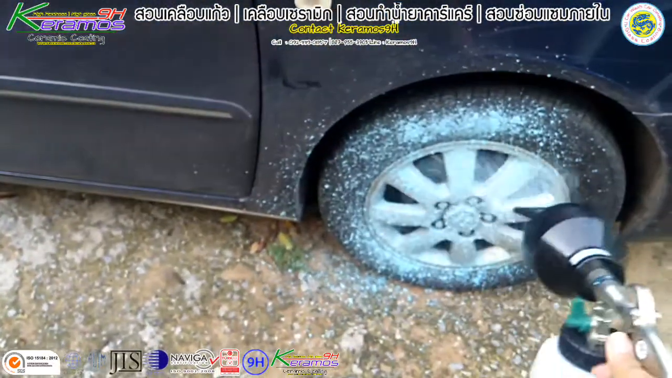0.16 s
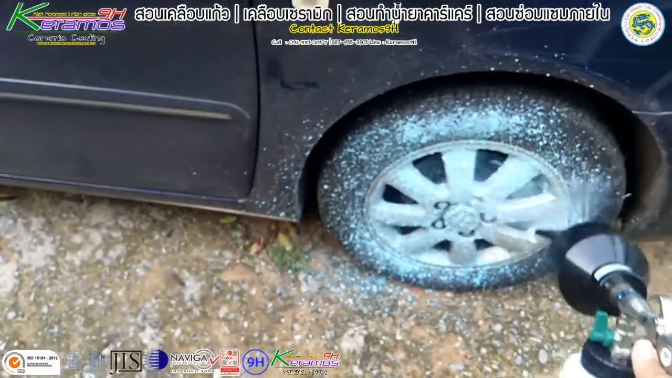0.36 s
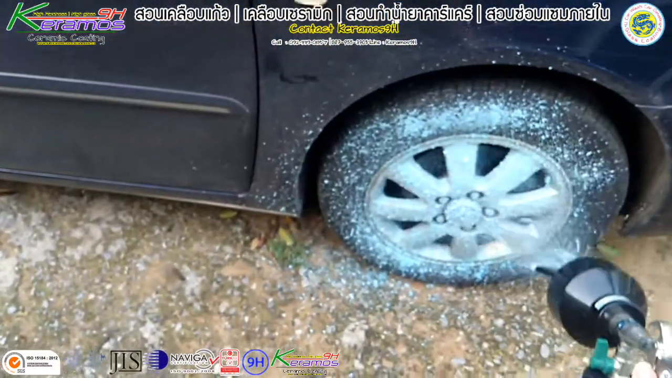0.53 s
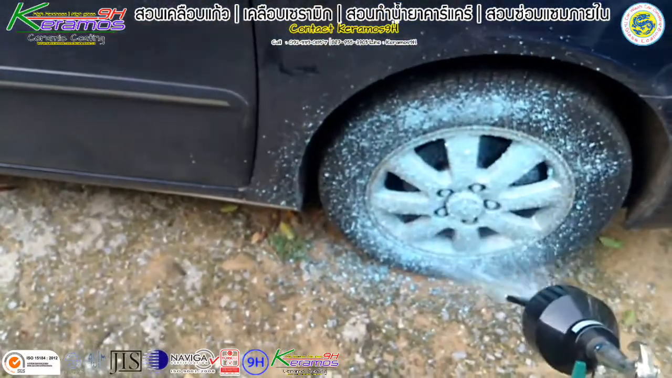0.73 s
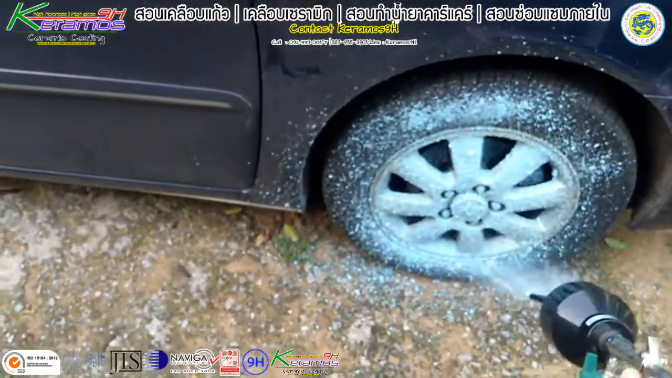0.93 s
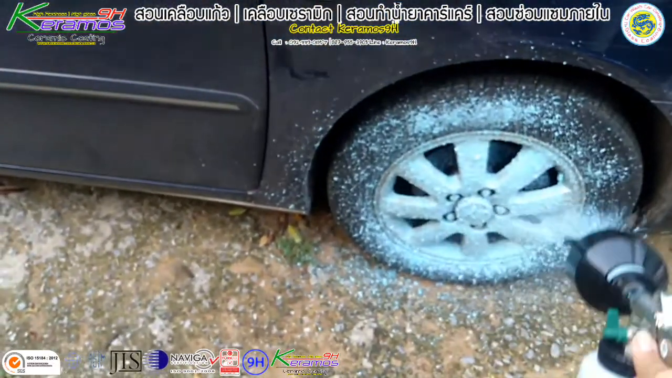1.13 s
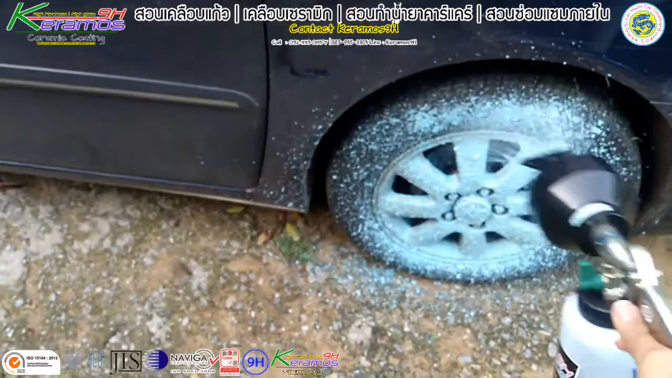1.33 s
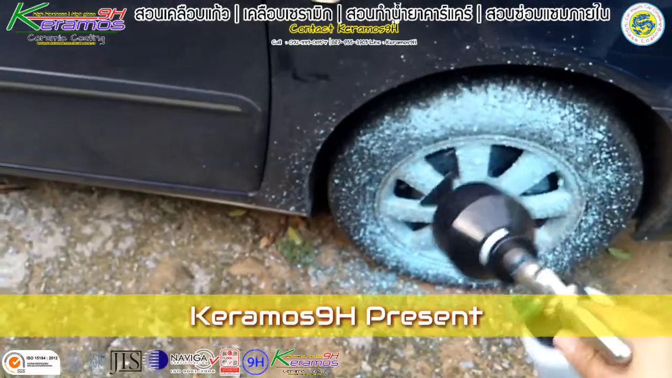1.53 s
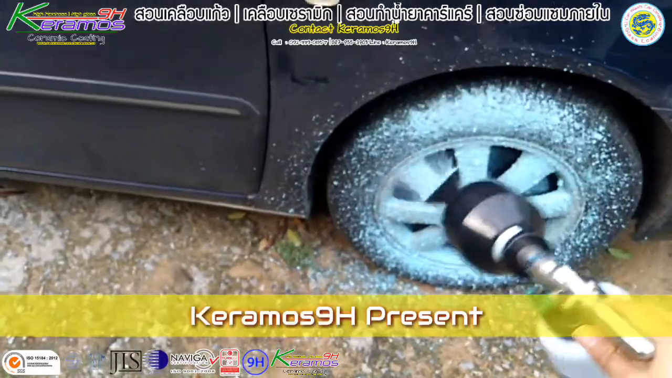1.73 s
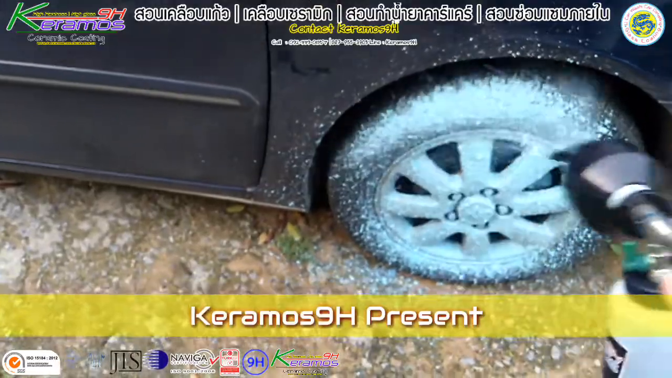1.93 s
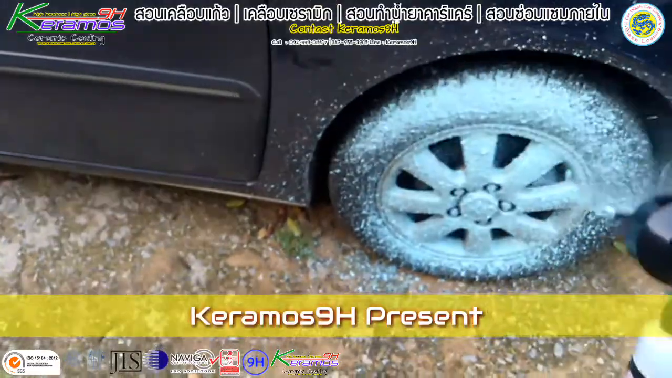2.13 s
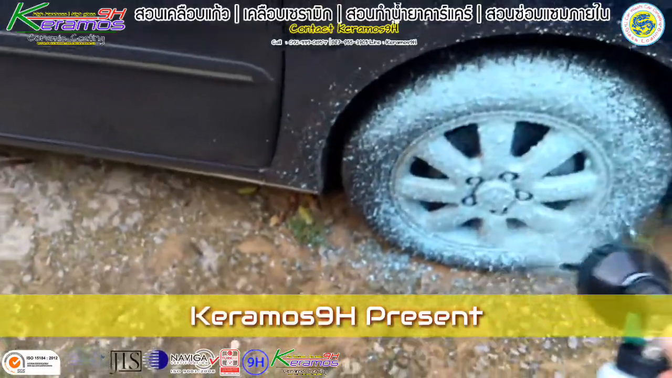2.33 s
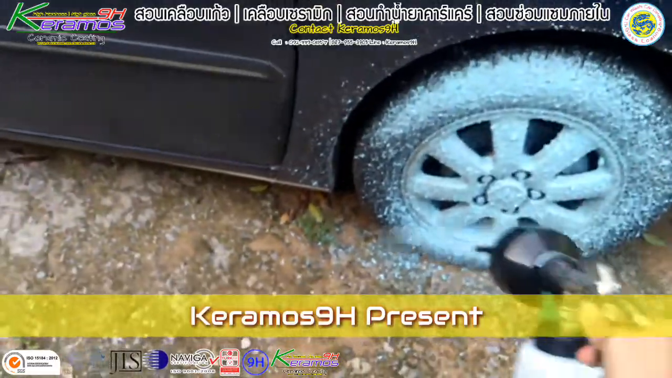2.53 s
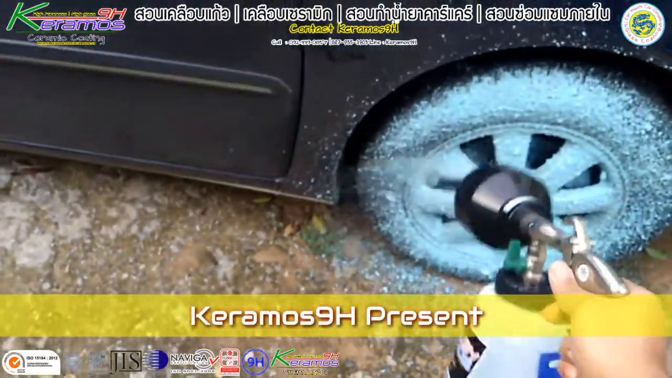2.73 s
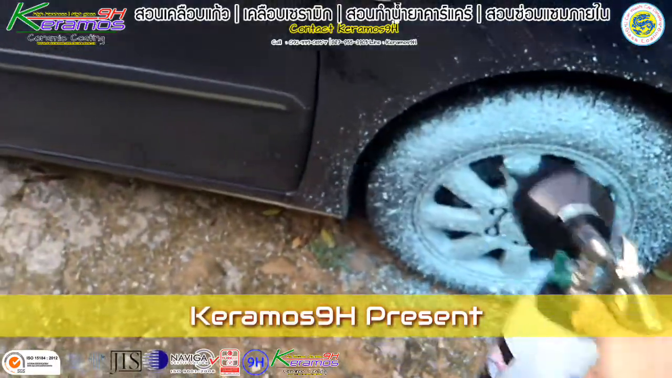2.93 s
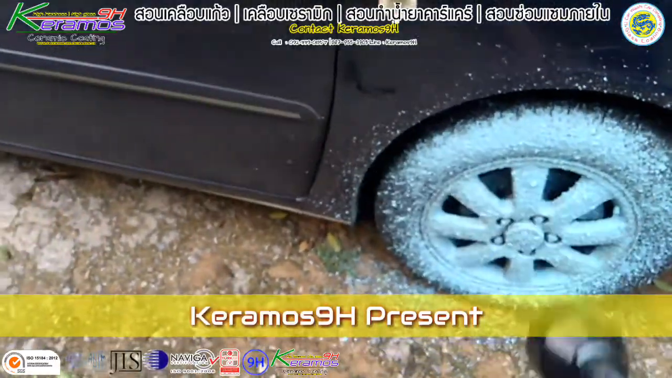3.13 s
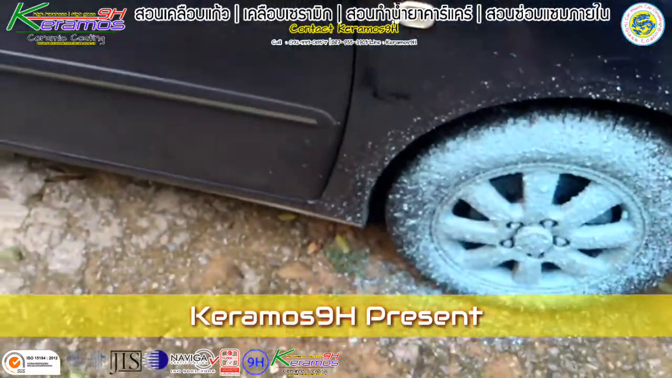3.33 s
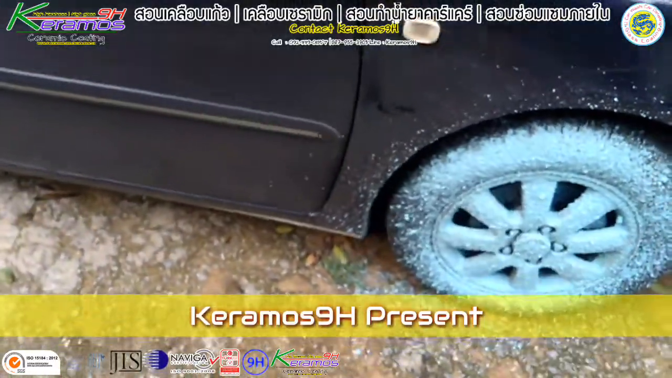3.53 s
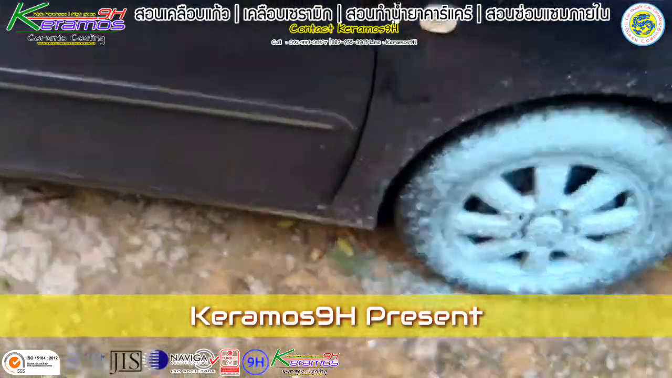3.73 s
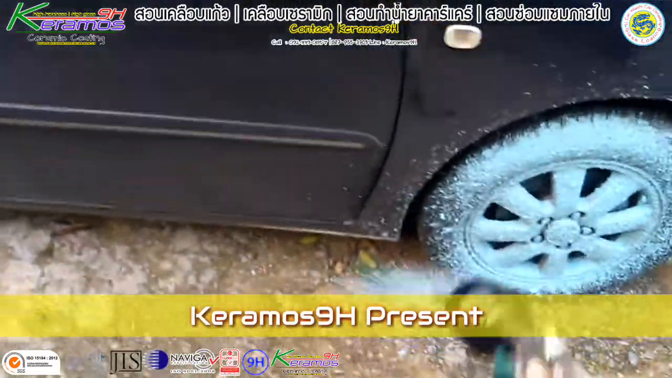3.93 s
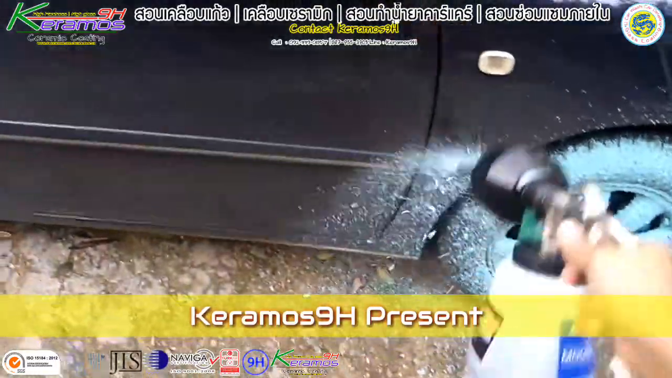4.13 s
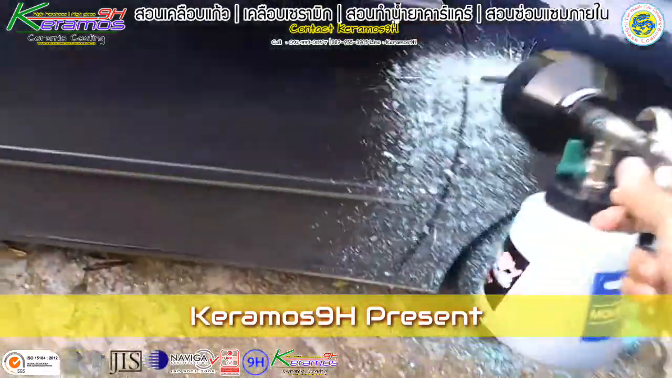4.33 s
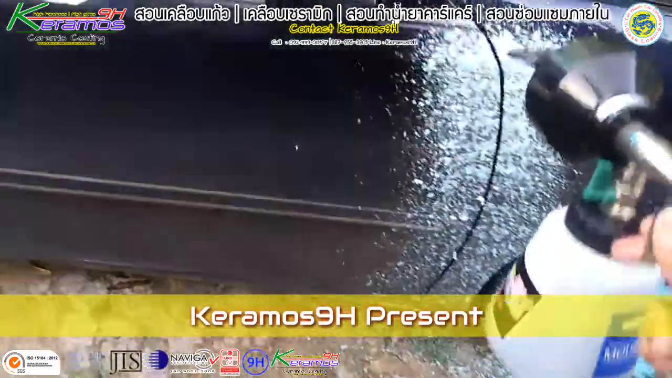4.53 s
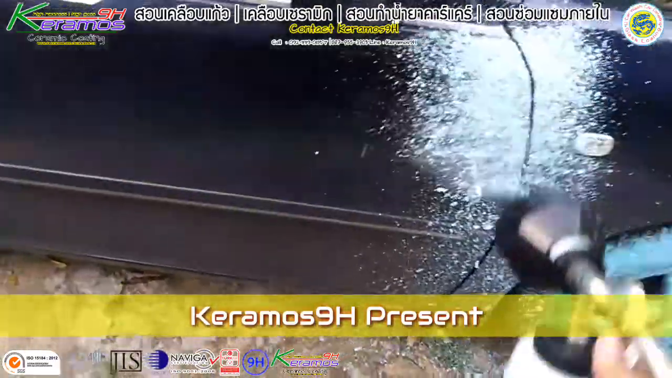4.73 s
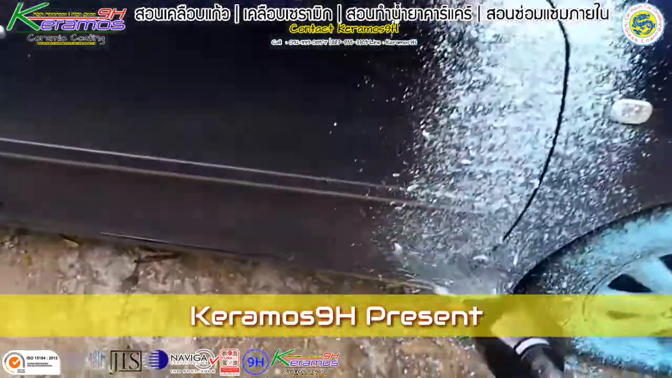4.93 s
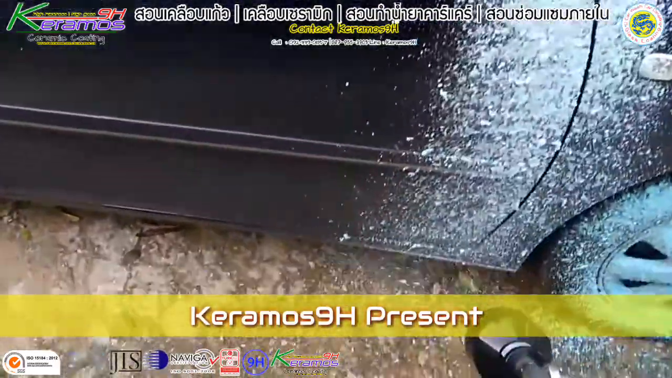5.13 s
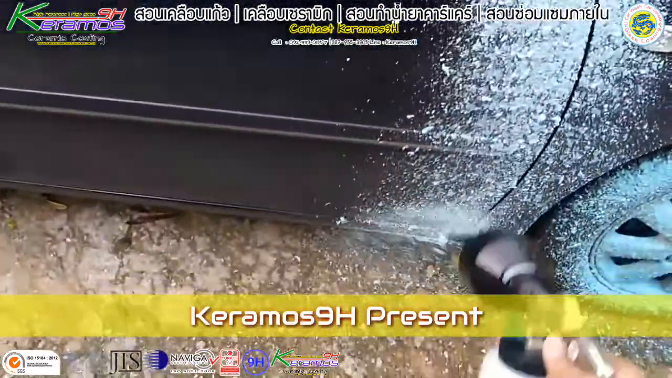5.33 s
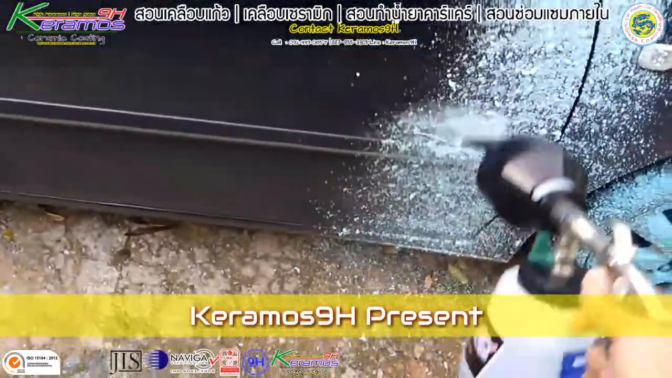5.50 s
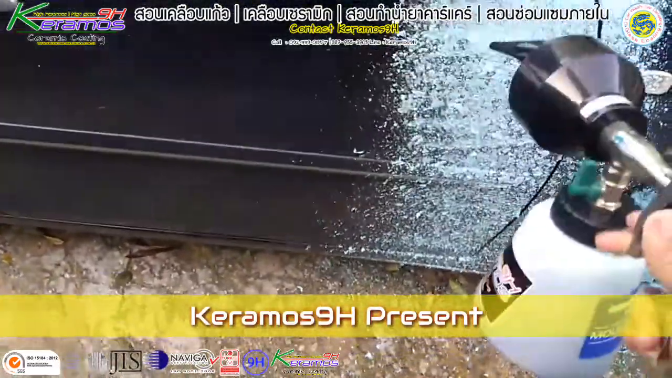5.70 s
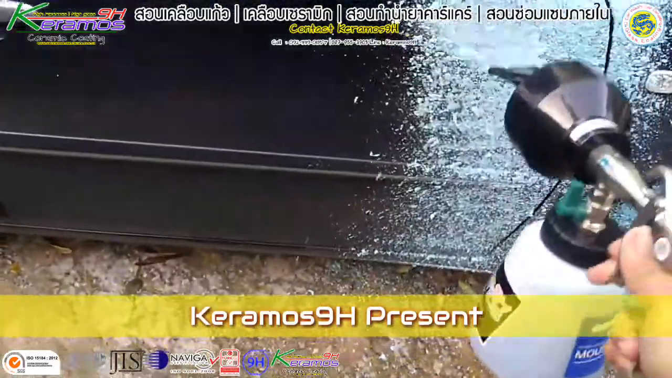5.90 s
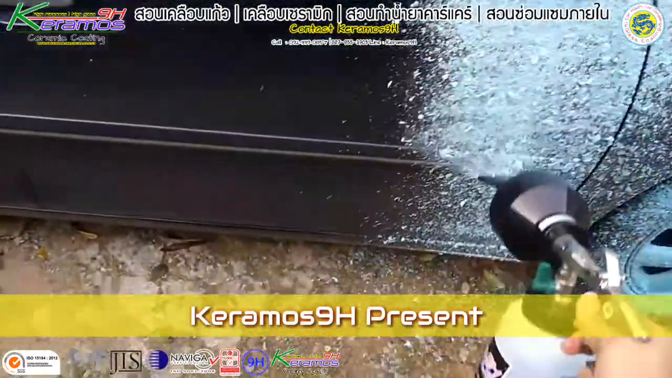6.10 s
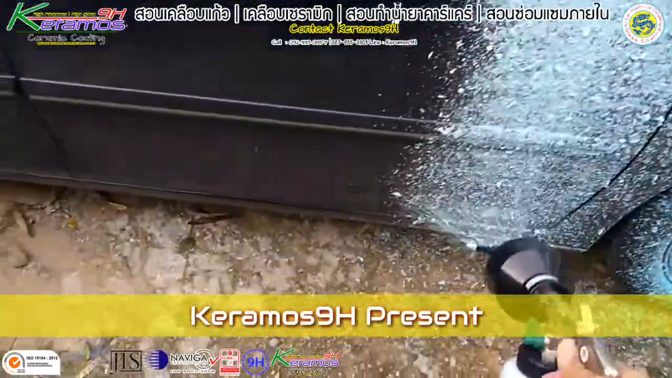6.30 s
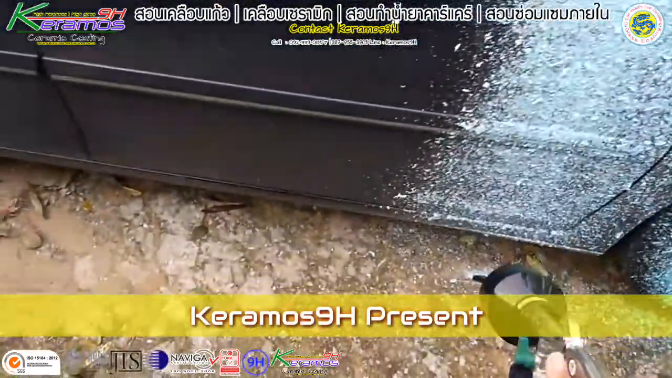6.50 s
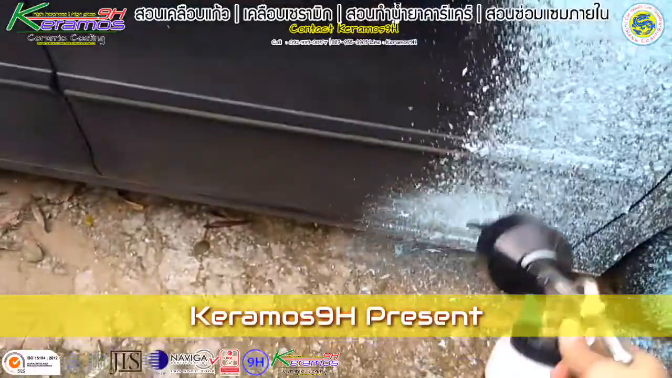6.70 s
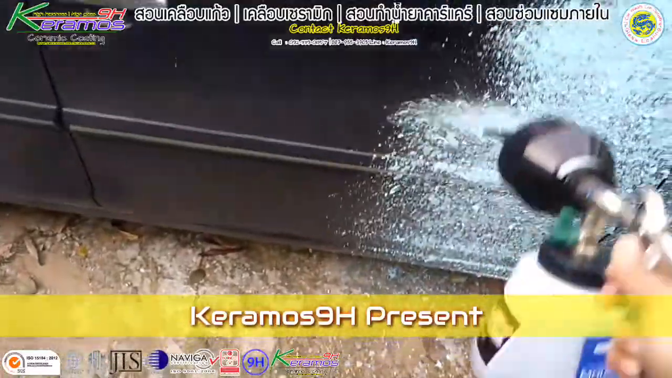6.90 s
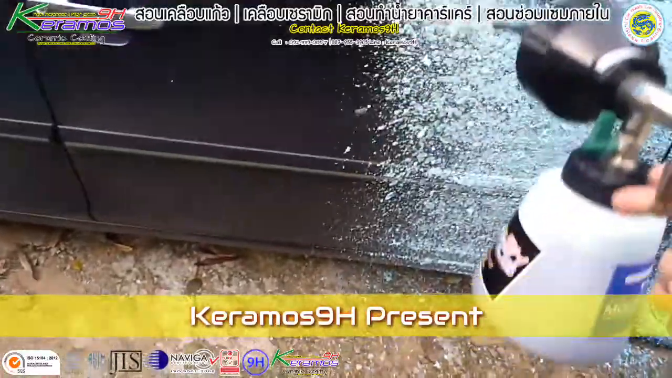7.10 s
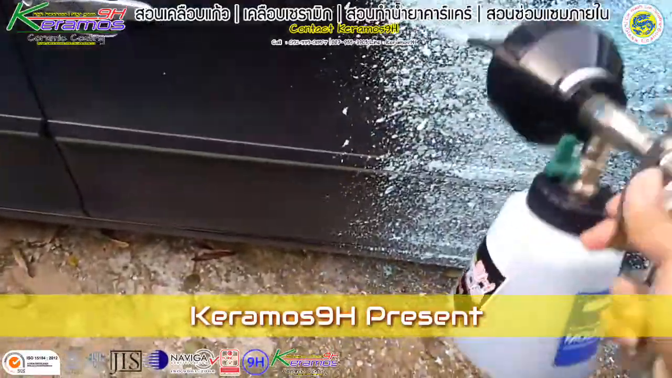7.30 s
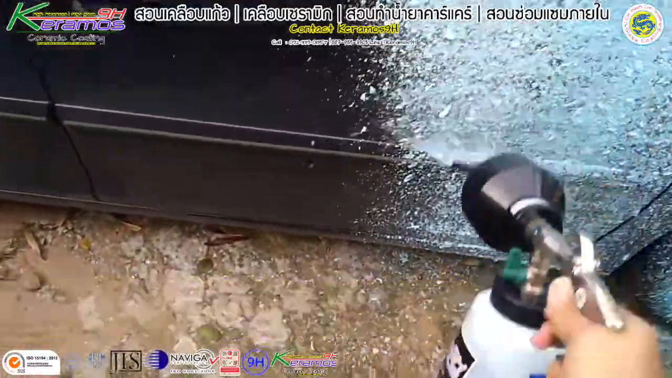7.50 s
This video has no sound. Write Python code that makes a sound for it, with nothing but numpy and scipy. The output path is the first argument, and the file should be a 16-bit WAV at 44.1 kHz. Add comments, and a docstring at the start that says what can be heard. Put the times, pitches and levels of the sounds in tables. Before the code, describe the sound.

Close, repeated bursts of hissing air and soap foam coat a car's wheel and door, with a low hum and rumble beneath.

```python
"""A loud, sputtering hiss: an air-driven foam gun sprays a car's wheel, then its door, outdoors.
In each of ten trigger pulls, rushing air makes the hiss and soap makes it sputter. Echoes off the
ground and the bodywork sweep its tone as the hand moves. The valve squeaks as it shuts and leaks
faintly between pulls. Behind it a machine, likely the compressor, throbs with two close low tones,
over an outdoor rumble, a far engine and one brush of wind."""
import sys
import numpy as np
from scipy import signal
from scipy.io import wavfile
from scipy.ndimage import map_coordinates

SR = 44100
rng = np.random.default_rng(int(sys.argv[2]) if len(sys.argv) > 2 else 0)


def put_to_file(sound):
    """Save the sound as 16-bit audio at rate SR, in the file named by the first command-line argument."""
    columns = np.atleast_2d(sound).T  # one column per channel
    safe = np.clip(columns, -1, 1)
    whole_steps = np.round(safe * 32767)
    wavfile.write(sys.argv[1], SR, whole_steps.astype(np.int16))


N = 332955
TIME = np.arange(N) / SR

# Trigger pulls. Each row: when the valve cracks, opens and shuts in seconds; hiss, opening surge,
# mist, low roar and singing band in relative dB; when the gun is nearest the bodywork in seconds,
# and that echo's delay in ms and level in dB at that moment.
PULLS = [(-.22, -0.202, 0.38, -14, -2, -0.5, 0, -5, .43, 0.95, -22),
         (0.461, 0.48, 0.92, -15, 3.5, -1.4, 0.5, -7, .43, .8, -14),
         (1.036, 1.053, 1.571, -15, 2, -0.5, 1, -10.5, 1.45, 0.83, -19),
         (1.834, 1.855, 2.973, -15, 4, -1.4, 0.5, -9, 2.95, 0.74, -14),
         (3.969, 3.997, 4.542, -14.5, 3, .5, -0.5, -13, 4.32, 0.96, -7.5),
         (4.674, 4.695, 5.19, -14, -1, 0.8, -1, -7.5, 5.02, 0.72, -4.5),
         (5.322, 5.343, 5.83, -14, 2, 0.5, -2.5, -18, 5.52, 0.73, -4.5),
         (5.977, 5.996, 6.473, -15, 4, 1.5, -1.5, -9, 6.34, 0.73, -5),
         (6.627, 6.641, 7.241, -14.5, 2, 0.5, -1, -22, 6.83, 0.893, -6),
         (7.357, 7.386, 7.78, -14.5, 2.5, 1, -2.5, -9.5, 7.78, .9, -6)]
# The tone of the hiss. Each row: frequency in Hz, relative level in dB.
HISS_SPECTRUM = [(120, -53), (200, -8), (231, -11), (381, -10), (517, -14), (1060, -3.5), (1490, -3.5),
                 (2210, -2.5), (2740, -2.5), (3280, 0), (5310, 2.5), (7080, -6.5), (10700, -13),
                 (13000, -13), (14500, -42)]
# Each row: frequency in Hz, how alike left and right are (0 unrelated, 1 or more the same).
HISS_LIKENESS = [(300, 1.5), (1200, .68), (3000, 0.24), (6000, 0.03), (12000, 0)]
# Each row: frequency in Hz, left level minus right level in dB.
HISS_BALANCE = [(200, -1), (370, 0.5), (680, -2), (1250, -6), (2300, -6), (4200, -5.5), (6000, -6),
                (8000, -8), (14000, -10)]
# The hiss dips briefly. Each row: time in seconds, level change in dB.
HISS_DIPS = [(0.075, -1)]
def jet(level_db=-3.5, splash_db=-.5, splash_follows=.54, patchy_db=1.46):
    """Churning air hisses and soap shakes it; splashing foam fills the middle, fine mist the top."""
    _, opens, _, hiss_db, surge_db, mist_db, roar_db, sing_db, *_ = current_pull()
    drive_db = pressure(np.maximum(TIME - opens, 0), surge_db)
    centres, bands = noise_bands(HISS_SPECTRUM, HISS_LIKENESS, per_octave=4)
    flutter_db = 1.59 * drift(49)   # the fan of foam flaps; the top stays steadier
    splash_shift_db = splash_db - (1 - splash_follows) * drive_db   # follows pressure only partly
    spray = singing_band(sing_db + patchy_db * drift(22), drive_db)
    for hz, band in zip(centres, bands):
        low = at_hz([(750, 1), (1050, 0)], hz)
        below_top = at_hz([(1700, 1), (3000, 0)], hz)
        top = at_hz([(6000, 0), (8500, 1)], hz)
        colour_db = low * roar_db + below_top * splash_shift_db + top * mist_db
        waver_db = (1 - top) * flutter_db + patchy_db * drift(16)
        spray = spray + band * panned(at_hz(HISS_BALANCE, hz)) * from_db(colour_db + waver_db)
    dip_db = sum(db * puff(s, .007) for s, db in HISS_DIPS)
    sputter_db = .33 * drift(68) + 1.07 * drift(210)
    return spray * valve() * from_db(level_db + hiss_db + drive_db + dip_db + sputter_db)


def current_pull():
    """The settings of the latest pull at every sample; the next takes over as its valve cracks."""
    rows = np.array(PULLS)
    return rows[np.maximum(np.searchsorted(rows[:, 0], TIME) - 1, 0)].T


def valve(open_s=.0048, shut_s=.0049, bleed_db=-16, bleed_s=.055, crack_db=-21):
    """Air flow: the valve cracks, then opens; after it shuts, the air left in the gun bleeds away."""
    flow = np.zeros(N)
    for cracks, opens, shuts, *_ in PULLS:
        rise = np.maximum(step(opens, open_s), from_db(crack_db) * step(cracks, .002))
        closed = step(shuts, shut_s)
        bleed = from_db(bleed_db) * np.exp(-np.maximum(TIME - shuts, 0) / bleed_s)
        flow += rise * (1 - closed + closed * bleed)
    return flow


def pressure(held_s, surge_db, peak_s=.037, period_s=.2, decay_s=.058, sag_db=2, sag_s=.46):
    """The jet's push in dB: air stored in the hose surges and settles, then the supply sags."""
    since_peak = held_s - peak_s
    surge = surge_db * np.exp(-np.abs(since_peak) / decay_s) * np.cos(2 * np.pi * since_peak / period_s)
    sag = sag_db * (1 - np.exp(-held_s / sag_s))
    return surge - sag + .5 * drift(6.2)


# The nozzle's note. Each row: time in seconds, pitch in Hz.
NOZZLE_PITCH = [(0, 5200), (.5, 5000), (.6, 4650), (.85, 5100), (1.35, 4550), (1.9, 5100), (2.15, 4700),
                (2.9, 5650), (4.02, 5000), (4.2, 5450), (6, 5700), (7.55, 5400)]
def singing_band(level_db, drive_db, extra_swing=.87):
    """The nozzle sings a breathy note that swings with the pressure more than the hiss does."""
    hz, = in_time(NOZZLE_PITCH)
    return panned(-8) * from_db(level_db + extra_swing * drive_db) * whistle(hz, width_hz=400)


# The hand swings up and down. Each row: turning point in seconds, ground echo delay in ms.
HAND_SWINGS = [(-.4, 3), (.1, 3.75), (1, 2.38), (1.75, 3.9), (2.55, 2.22), (3.3, 3.8), (3.95, 2.6),
               (4.5, 3.7), (5.25, 2.25), (5.95, 3.2), (6.5, 2.3), (7.22, 3.5), (7.8, 2.4)]
# The ground echo is stronger by the wheel than by the door.
# Each row: time in seconds, level in dB with the hand at its lowest.
GROUND_ECHO = [(3, -7), (4, -16.5)]
def echo_paths(sweep_ms_per_s2=3.75):
    """Delay and strength of the ground and bodywork echoes; each weakens as its path grows."""
    *_, nearest_s, nearest_ms, nearest_db = current_pull()
    ground_db, = in_time(GROUND_ECHO)
    ground_ms = eased(HAND_SWINGS)
    ground_gain = from_db(ground_db) * ground_ms.min() / ground_ms
    body_ms = nearest_ms + sweep_ms_per_s2 * np.square(TIME - nearest_s)
    body_gain = from_db(nearest_db) * nearest_ms / body_ms
    return ground_ms, ground_gain, body_ms, body_gain


# The nozzle's direction. Each row: time in seconds, how much sooner the left side hears it in ms.
LEFT_LEAD = [(0, .03), (.35, .135), (1.25, .14), (1.7, .03), (2.35, .18), (2.75, .04), (4.9, .07),
             (5.8, .05), (7.55, .07)]
def reflections(spray, dull_hz=7000, scatter_db=-12.5, scatter_count=5, sway_ms=.2, spread_ms=.03):
    """Echoes off the ground and bodywork boost some pitches of the hiss and cancel others."""
    lead_ms, = in_time(LEFT_LEAD)
    ground_ms, ground_gain, body_ms, body_gain = echo_paths()
    # rim, arch and bottle scatter only the treble, on paths that sway with the hand
    paths = [(ms + sway_ms * drift(1.51), rng.choice([-1, 1]))
             for ms in rng.uniform(1, 4.5, scatter_count)]
    sides = []
    for direct in spray:
        dull = signal.sosfilt(signal.butter(1, dull_hz, fs=SR, output="sos"), direct)
        treble = signal.sosfilt(signal.butter(1, 1000, "high", fs=SR, output="sos"), direct)
        ground = ground_gain * delayed(dull, ground_ms)
        body = body_gain * delayed(dull, body_ms + .5 * spread_ms * drift(4.6))
        gun = from_db(-20) * delayed(dull, ms=.902)   # a steady echo, likely off the gun itself
        scatter = sum(sign * delayed(treble, ms + spread_ms * rng.standard_normal())
                      for ms, sign in paths)
        sides.append(direct + ground + body + gun + from_db(scatter_db) * scatter)
    power = 1 + ground_gain ** 2 + body_gain ** 2 / 2 + scatter_count * from_db(scatter_db) ** 2
    return np.array([sides[0], delayed(sides[1], lead_ms)]) / np.sqrt(power)


# The tone of the leak. Each row: frequency in Hz, relative level in dB.
LEAK_SPECTRUM = [(600, 0), (850, 1.5), (1300, -4.5), (2000, -2.5), (2900, -6.5), (4200, -11), (5700, -4.5),
                 (7200, -13), (10000, -18), (14500, -22)]
# Each row: frequency in Hz, how alike left and right are (0 is unrelated).
LEAK_LIKENESS = [(600, .4), (1300, 0)]
# Valve squeaks. Each row: time in seconds, pitch in Hz, level in dB.
SQUEAKS = [(.95, 7900, -51), (1.58, 8100, -38), (2.972, 8040, -33), (4.565, 7700, -40), (5.215, 8000, -54),
           (5.85, 9460, -32), (6.505, 8000, -44), (7.255, 8100, -35)]
# The idle nozzle spits foam. Each row: time in seconds, level in dB.
SPITS = [(3.235, -55), (3.33, -61), (3.65, -55), (3.9, -62)]
# The tone of a spit. Each row: frequency in Hz, relative level in dB.
SPIT_SPECTRUM = [(3500, -17), (4600, -2), (7000, -2), (10000, -17), (14500, -5)]
def valve_noises(leak_db=-53.5, thin_db=-69, squeak_s=.0078, spit_s=.021):
    """The narrowing gap squeaks as it shuts; a faint leak and thin whistle never stop, and foam spits."""
    thin_whistle = from_db(thin_db + 3 * drift(8)) * whistle(8550, width_hz=360)
    leak = from_db(leak_db) * sum(noise_bands(LEAK_SPECTRUM, LEAK_LIKENESS, per_octave=3)[1])
    squeaks = sum(from_db(db) * whistle(hz, width_hz=130) * puff(s, squeak_s) for s, hz, db in SQUEAKS)
    spits = noise(SPIT_SPECTRUM) * sum(from_db(db) * puff(s, spit_s) for s, db in SPITS)
    return (leak + thin_whistle + squeaks + spits) * panned(-4)


# The machine's main tone. Each row: time in seconds, level in dB.
MAIN_LEVEL = [(0.0, -34), (0.14, -26), (1.41, -29.5), (1.62, -26.5), (2.37, -31), (2.52, -26), (3.7, -26),
              (5.13, -37.5), (6.94, -31.5), (7.55, -62)]
# Its lower tone. Each row: time in seconds, level in dB.
LOWER_LEVEL = [(0.0, -52), (0.04, -46), (3.28, -37), (3.7, -49), (3.81, -45), (5.68, -55), (5.72, -39),
               (6.96, -41), (7.55, -63)]
def machine(main_hz=77.75, lower_hz=67.9):
    """Two close low tones slip in and out of step, throbbing about ten times a second."""
    main_db, = in_time(MAIN_LEVEL)
    lower_db, = in_time(LOWER_LEVEL)
    main_pitch = main_hz + .28 * drift(1)
    lower_pitch = lower_hz + .66 * drift(2.6)
    hum = tone(main_pitch) + from_db(-26 + 3 * drift(6)) * tone(2 * main_pitch)
    waver_db = .7 * drift(6)
    return from_db(main_db + waver_db) * hum + from_db(lower_db) * tone(lower_pitch)


# Each row: time in seconds, firing rate in Hz, levels in dB of the tones at 2 and 3 times that rate.
ENGINE_DRONE = [(0, 68, -60, -58), (.6, 67.6, -61, -60), (1.15, 67.8, -45, -42.5), (1.8, 67.8, -44.5, -45),
                (2.15, 68, -58, -55), (4, 70, -64, -63), (6.6, 73.75, -61, -63), (7.1, 73.1, -52.5, -67),
                (7.55, 71.8, -44.5, -66)]
def far_engine():
    """A distant engine drones at two and three times its firing rate."""
    firing_hz, second_db, third_db = in_time(ENGINE_DRONE)
    firing_hz = firing_hz + .356 * drift(4)
    return from_db(second_db) * tone(2 * firing_hz) + from_db(third_db) * tone(3 * firing_hz)


# A puff of wind. Each row: time in seconds, level in dB.
GUSTS = [(1.42, -32)]
# Its tone. Each row: frequency in Hz, relative level in dB.
GUST_SPECTRUM = [(20, -2), (45, -7), (110, -2), (200, -20)]
def wind(gust_s=.027):
    """Wind brushes the microphone with a short, low bump."""
    return noise(GUST_SPECTRUM) * sum(from_db(db) * puff(s, gust_s) for s, db in GUSTS)


# The rumble's rise and fall. Each row: time in seconds, level in dB shared by its two layers.
RUMBLE_LEVEL = [(0, -42.5), (1.1, -39), (3.8, -39.5), (4.9, -40.5), (5.2, -42), (6.9, -44.5), (7.55, -49)]
# The low layer. Each row: frequency in Hz, relative level in dB.
LOW_SPECTRUM = [(65, -32), (110, 3), (146, -4.5), (211, -7), (247, -13), (271, -15), (362, -14.5),
                (590, -16), (1200, -28), (1560, -77), (2640, -120)]
# The deepest layer. Each row: frequency in Hz, relative level in dB.
DEEP_SPECTRUM = [(20, -22), (32, -25), (48, -2), (62, 0.5), (85, -6), (110, -28), (150, -34)]
def outdoor_rumble(low_db=-2, deep_db=1):
    """Two layers of low noise swell a little, then fade."""
    level_db, = in_time(RUMBLE_LEVEL)
    layers = from_db(low_db) * noise(LOW_SPECTRUM) + from_db(deep_db) * noise(DEEP_SPECTRUM)
    return from_db(level_db) * layers


def noise_bands(spectrum, likeness, per_octave):
    """Band centres in Hz and their stereo noises, which add up to a noise of power 1."""
    low, high = spectrum[0][0], min(spectrum[-1][0], .45 * SR)
    edges = np.geomspace(low, high, round(np.log2(high / low) * per_octave) + 1)
    centres = np.sqrt(edges[1:] * edges[:-1])
    white = rng.standard_normal((2, 2, N))
    bands = []
    for k, hz in enumerate(centres):
        band_filter = signal.butter(2, edges[k:k + 2], "band", fs=SR, output="sos")
        mid, side = from_db(at_hz(spectrum, hz)) * signal.sosfilt(band_filter, white[k % 2])
        alike = np.clip(at_hz(likeness, hz), 0, 1)
        mid, side = np.sqrt(1 + alike) * mid, np.sqrt(1 - alike) * side
        bands.append(np.array([mid + side, mid - side]))
    total = np.sqrt(sum(np.mean(b ** 2) for b in bands))
    return centres, [b / total for b in bands]


def noise(spectrum):
    """Steady stereo noise, with left and right alike in the bass."""
    return sum(noise_bands(spectrum, [(100, .93), (600, .49), (4000, .049)], per_octave=2)[1])


def whistle(hz, width_hz):
    """A narrow band of air noise around a steady or moving pitch."""
    phase = 2 * np.pi * np.cumsum(hz * np.ones(N)) / SR
    return drift(width_hz) * np.cos(phase) + drift(width_hz) * np.sin(phase)


def tone(hz):
    """A pure tone of power 1 that follows a pitch curve."""
    return np.sqrt(2) * np.sin(2 * np.pi * np.cumsum(hz) / SR)


def drift(rate):
    """A smooth random wobble of typical size 1, changing about rate times a second."""
    r = np.exp(-40 * np.pi * rate / SR)
    slow = signal.lfilter([1], [1, -2 * r, r * r], rng.standard_normal(N // 20 + 4002))[4000:]
    slow /= np.sqrt(np.mean(slow ** 2) + 1e-20)
    return np.interp(np.arange(N) / 20, np.arange(len(slow)), slow)


def delayed(x, ms):
    """The sound x made late by a steady or moving delay."""
    return map_coordinates(x, [np.arange(N) - ms * SR / 1000], order=3, mode="nearest")


def from_db(db):
    """Decibels to gain."""
    return 10 ** (np.asarray(db) / 20)


def panned(db):
    """Left and right gains; negative dB leans right."""
    return from_db(db * np.array([[.5], [-.5]]))


def in_time(rows):
    """Each column of a curve at every sample."""
    s, *columns = np.transpose(rows)
    return [np.interp(TIME, s, c) for c in columns]


def at_hz(points, hz):
    """Read a curve at one frequency, with octaves evenly spaced."""
    f, value = np.transpose(points)
    return np.interp(np.log(hz), np.log(f), value)


def puff(s, half_s):
    """A short rounded swell around time s."""
    return 1 / (1 + ((TIME - s) / half_s) ** 4)


def step(s, soft_s):
    """A smooth rise from 0 to 1 around time s."""
    return .5 + .5 * np.tanh((TIME - s) / (2 * soft_s))


def eased(rows):
    """A swing that slows to rest at each turning point."""
    s, value = np.transpose(rows)
    leg, part = np.divmod(np.interp(TIME, s, np.arange(len(s))), 1)
    return np.interp(leg + .5 - .5 * np.cos(np.pi * part), np.arange(len(s)), value)


def scene():
    """The gun close by and louder on the right, the machine and the outdoors behind."""
    return reflections(jet()) + valve_noises() + machine() + far_engine() + wind() + outdoor_rumble()


def record(dry, ceiling=.82, cutoff_hz=14350):
    """The loudest peaks are rounded and the highest treble is cut steeply."""
    rounded = dry / (1 + (dry / ceiling) ** 6) ** (1 / 6)
    return signal.sosfilt(signal.ellip(12, .1, 90, cutoff_hz, fs=SR, output="sos"), rounded)


dry = scene()
out = record(dry)
put_to_file(out)
```